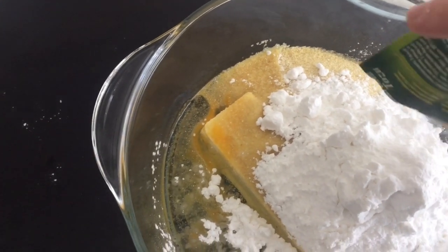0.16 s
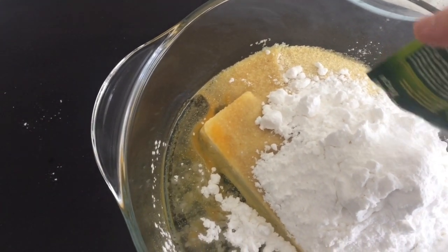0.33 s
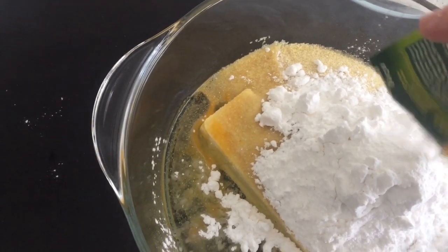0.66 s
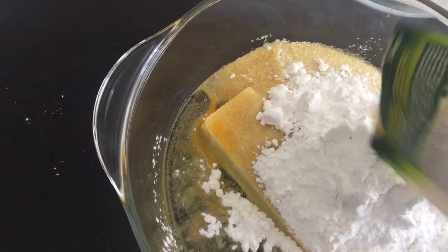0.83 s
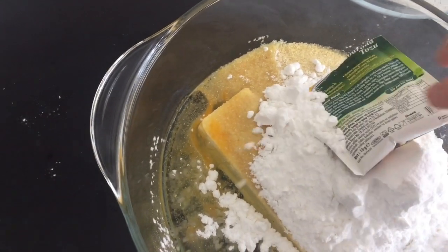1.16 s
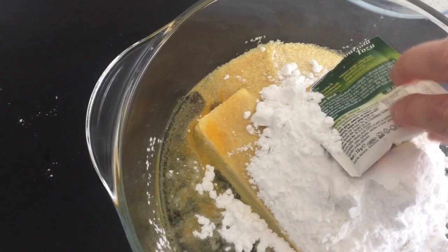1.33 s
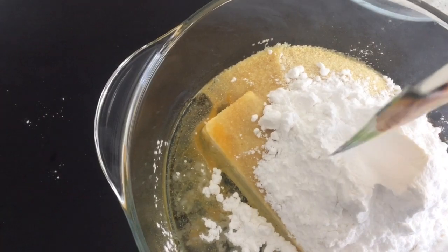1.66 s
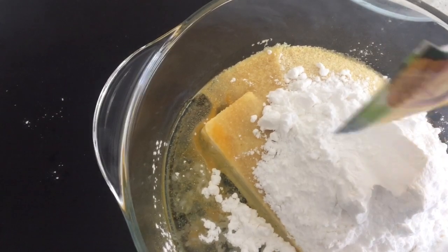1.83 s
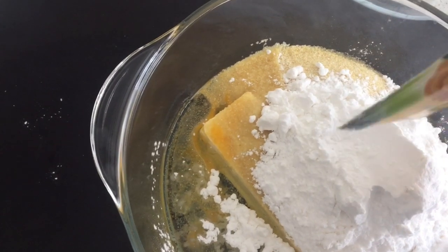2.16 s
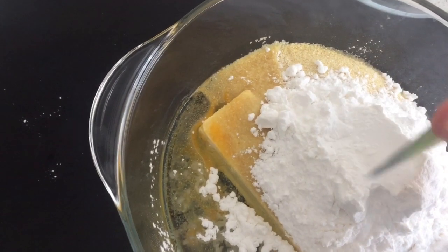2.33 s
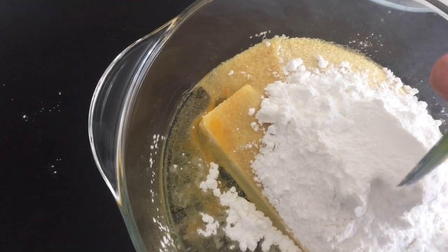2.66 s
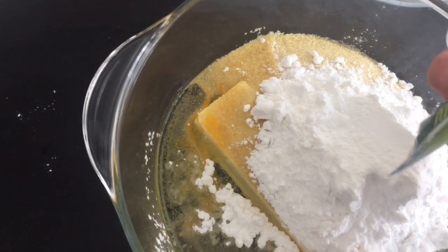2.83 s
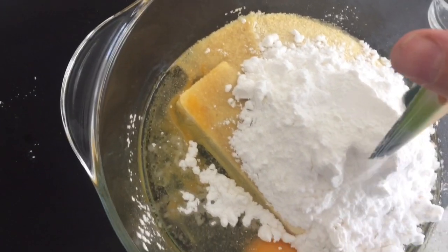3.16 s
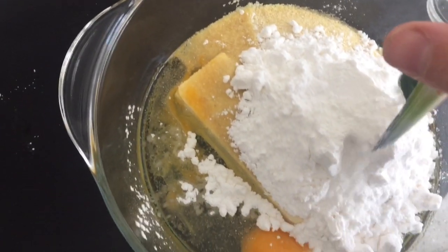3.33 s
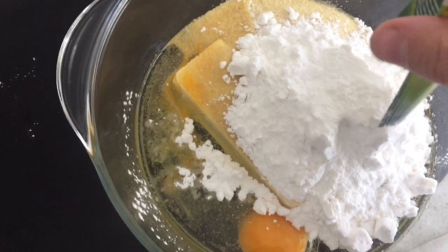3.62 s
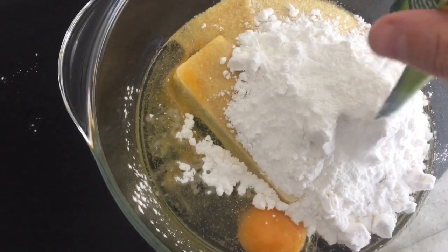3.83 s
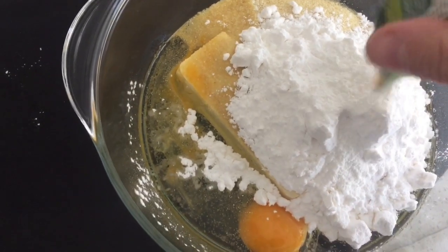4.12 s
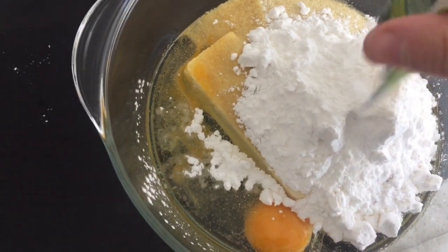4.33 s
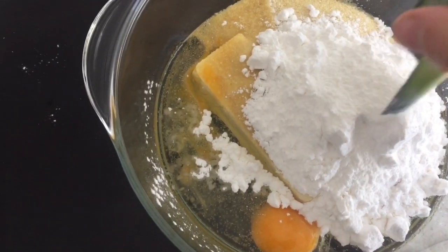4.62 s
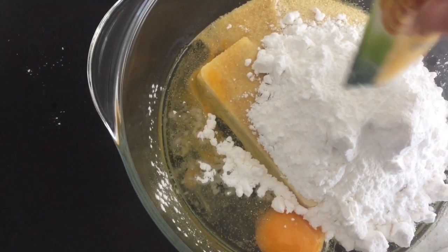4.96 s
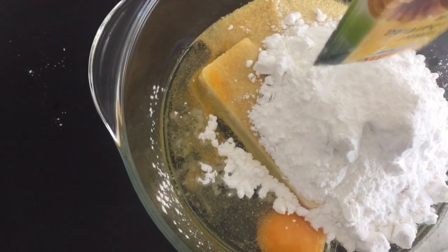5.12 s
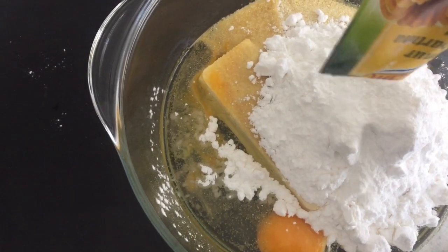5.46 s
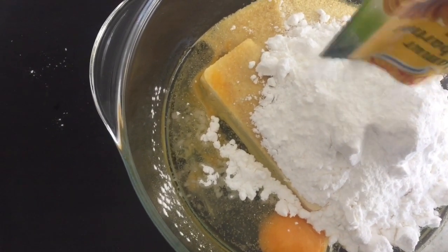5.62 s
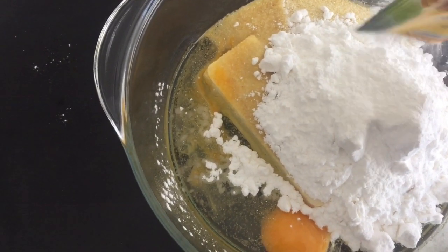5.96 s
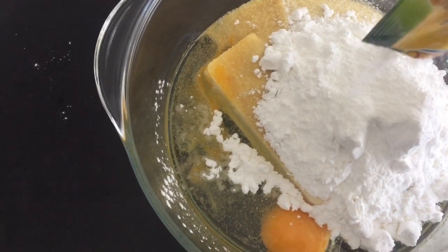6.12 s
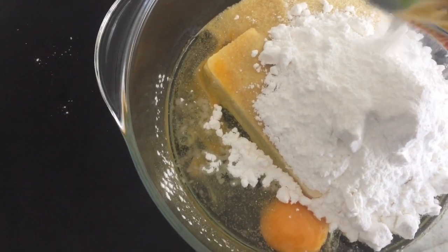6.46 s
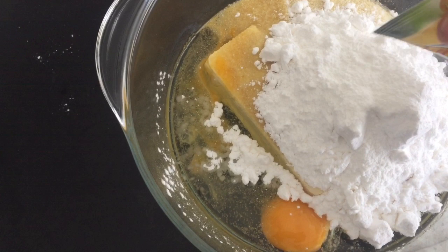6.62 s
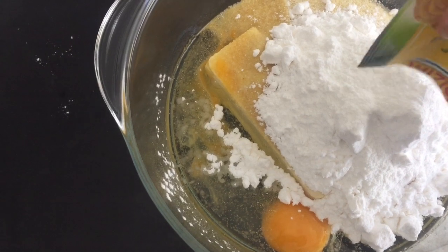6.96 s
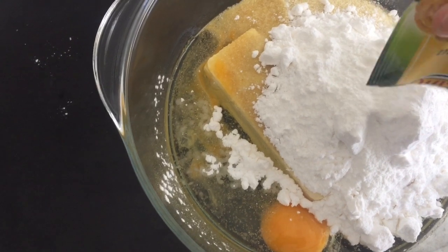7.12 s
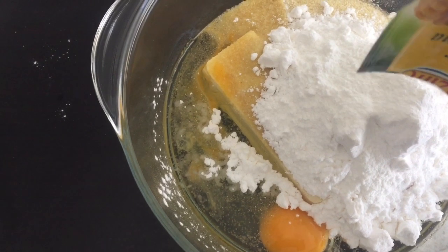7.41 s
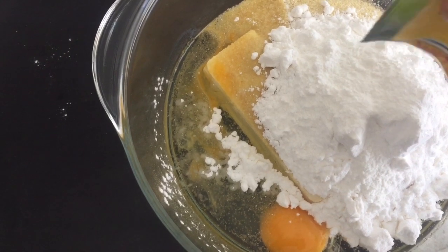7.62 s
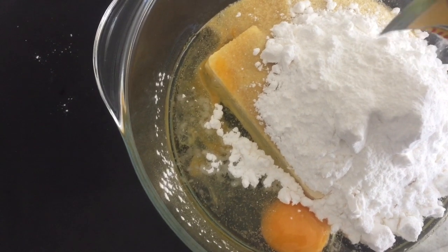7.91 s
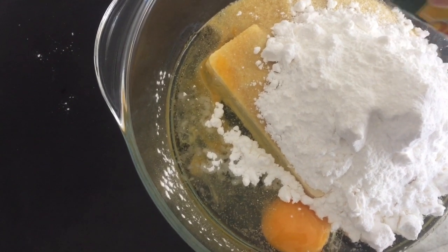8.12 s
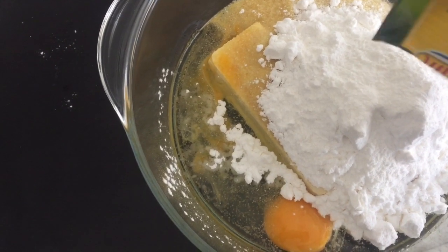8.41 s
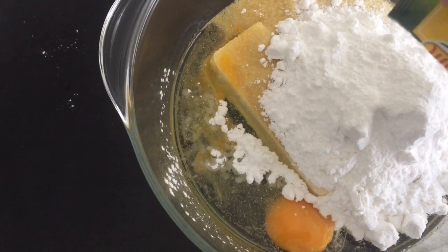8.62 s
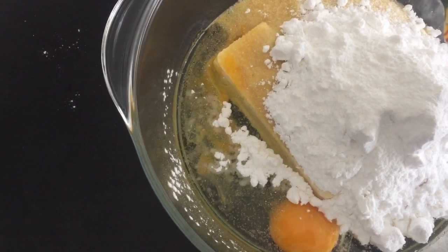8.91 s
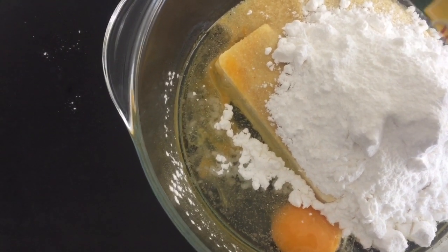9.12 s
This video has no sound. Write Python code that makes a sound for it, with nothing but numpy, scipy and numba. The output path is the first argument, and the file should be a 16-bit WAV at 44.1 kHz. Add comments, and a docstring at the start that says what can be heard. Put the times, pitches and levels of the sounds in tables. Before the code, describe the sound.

A low, wavering kitchen hum with faint hiss runs throughout. From 0.3 to 1 s a small paper sachet gives faint ticks and light, bright brushing. At 1.5 s comes a clear crisp double snap, then quiet, with a soft rub and crackles at 2.2 s. A sharper cluster cracks at 3.05 s, another snap at 3.6 s, and small ticks at 4.2 and 4.5 s, separated by near silence and occasional dull, soft hand bumps. From about 4.9 s the rustling becomes almost continuous: gritty swishes at 5 s, a bright snap at 5.4 s, and a dense burst of crackles from 6.3 to 6.7 s. Irregular shaking strokes follow through 7 s, with rapid wrinkling around 8.1 s. The strongest, driest cracks come at 8.5, 8.8 and 9.25 s, with soft low flapping underneath and a brief hollow bowl ring. It ends mid-rustle at about 9.3 s.

```python
"""A faint low hum, then dry paper snaps: a small sachet is tipped, flexed and shaken over a glass bowl in a kitchen.
Creases buckle as bursts of damped modes, wrinkles tick at random, and the walls rub as gritty filtered noise.
The hand adds soft decaying tones and the flapping sides a low noise flutter.
Resonators and short noise tails make the bowl and room; the hum and hiss are shaped noise."""
import sys
import numpy as np
from scipy import signal
from scipy.fft import rfft, irfft, next_fast_len
from scipy.io import wavfile
from numba import njit

SR = 44100
rng = np.random.default_rng(int(sys.argv[2]) if len(sys.argv) > 2 else 0)


def to_wav(s):
    """Save 16-bit WAV."""
    ch = np.atleast_2d(s).T  # columns
    pcm = np.round(np.clip(ch, -1, 1) * 32767)  # PCM
    wavfile.write(sys.argv[1], SR, pcm.astype(np.int16))


N = 409248
TIME = np.arange(N) / SR
LOW_CUT_HZ, TOP_HZ = 690, 16300


def undb(db):
    """Decibels to gain."""
    return 10 ** (np.asarray(db) / 20)


def unit(x):
    """Scale to rms 1."""
    return x / np.sqrt(np.mean(x ** 2) + 1e-20)


def colour(points, hz):
    """Spectrum gain, with dB interpolated over log frequency."""
    point_hz, point_db = np.transpose(points)
    log_hz = np.log(np.maximum(hz, 1))
    return undb(np.interp(log_hz, np.log(point_hz), point_db))


def shaped(x, points):
    """Give a signal a spectrum, at rms 1."""
    size = next_fast_len(N)
    gain = colour(points, np.fft.rfftfreq(size, 1 / SR))
    return unit(irfft(rfft(x, size) * gain, size)[:N])


def walk(rate_hz):
    """Random values joined by straight lines, rate_hz new ones a second, at rms 1."""
    values = rng.standard_normal(N // 10)
    return unit(np.interp(TIME * rate_hz, np.arange(N // 10), values))


def fade(t_s, t60_s):
    """Exponential decay by 60 dB in t60_s."""
    return np.exp(-np.log(1000) * t_s / t60_s)


def add(out, start_s, sound):
    """Mix a sound in at a time."""
    i = int(np.clip(start_s * SR, 0, N - 1))
    out[i:i + len(sound)] += sound[:N - i]


def swell(top_s, half_s):
    """Gaussian rise and fall, down to 1/e at half_s from the top."""
    return np.exp(-((TIME - top_s) / half_s) ** 2)


def envelope(full_s, hold_s, attack_s=0.024, release_t60_s=0.071):
    """One finger move: linear attack ending at full_s, hold, exponential release."""
    t = TIME - full_s
    attack = np.clip(1 + t / attack_s, 0, 1)
    return attack * fade(np.clip(t - hold_s, 0, 1), release_t60_s)


# Spectrum of the paper modes in a crack. Each row: frequency in Hz, relative level in dB.
CRACK_SPECTRUM = [(300, -36), (600, -8.5), (1100, -3.5), (1500, -1), (2400, 4.5), (4300, 3.5), (6600, 1),
                  (9000, 1.5), (15000, -3.5)]


def buckle(facet_hz, facet_db, ring_ms, count=110, in_step=0.66, facet_q=4.65):
    """One crease flips: dense, heavily damped paper modes, coloured by the facet they set ringing."""
    t = np.arange(SR // 36) / SR
    hz = (np.arange(count) + 3 + rng.random(count)) * TOP_HZ / (count + 3)
    octave = np.log2(hz / 4000)[:, None]
    # modes partly in step give the sharp front
    size = colour(CRACK_SPECTRUM, hz) * (in_step + rng.uniform(-0.96, 1, count))
    # bending waves: treble arrives first and dies soonest
    age_s = np.maximum(t - 0.0003 * 2 ** (-octave / 2), 0)
    t60_s = ring_ms / 1000 * 2 ** (-0.3 * octave)
    rise = 1 - np.exp(-age_s / (t60_s / 80))
    modes = np.sin(2 * np.pi * hz[:, None] * age_s) * rise * fade(age_s, t60_s)
    crack = size @ modes
    facet = signal.lfilter(*signal.iirpeak(facet_hz, facet_q, fs=SR), crack)
    sound = crack + undb(facet_db) * facet
    front_rms = np.sqrt(np.mean(sound[:SR // 200] ** 2))
    return sound / front_rms


# Larger creases. Each row: time in seconds, level in dB, facet pitch in Hz, facet gain over the bare crack in dB.
CREASES = [(0.357, -52, 1300, 22), (0.7017, -41.0, 12980, 20), (0.712, -35.5, 12660, 13),
           (0.7186, -36, 13650, 8), (0.7655, -40.5, 14000, 12), (0.7876, -44, 1910, 30),
           (0.897, -52, 4860, 16), (0.9756, -45.5, 945, 19), (1.047, -56.5, 1120, 35),
           (1.44, -52.5, 2640, 21), (1.477, -46, 1050, 21), (1.495, -26, 3200, 3.5), (1.505, -29, 2550, 9),
           (1.513, -40, 2280, 11), (1.76, -39.5, 4240, 6), (2.219, -44, 3250, 4), (2.228, -35, 4700, 17),
           (2.232, -36, 1570, 20), (2.247, -32, 1390, 9), (2.3735, -56, 1780, 6), (2.485, -57, 1700, 17),
           (3.022, -48.5, 1920, 21), (3.046, -35.5, 1560, 33), (3.053, -37.5, 1150, 21),
           (3.0685, -32, 2680, 13), (3.081, -24.5, 2320, 11.5), (3.0821, -27, 9500, 15),
           (3.58, -48.5, 1670, 16), (3.6387, -30, 1720, 9.5), (3.6444, -27.5, 2510, -2),
           (4.026, -36.5, 3030, 6), (4.115, -44, 2430, 36), (4.1989, -33.5, 1430, 10),
           (4.5132, -33.5, 2870, 7), (4.584, -32, 13310, 6.5), (4.601, -41, 1600, 26),
           (4.822, -54.5, 1710, 36), (4.876, -32.5, 10500, 1), (4.978, -35.5, 1650, 12),
           (4.9958, -29.5, 2070, 7), (5.0546, -32.5, 11740, 4), (5.073, -35, 2940, 12),
           (5.082, -34, 5950, 12), (5.1224, -42.5, 2530, 15), (5.14, -42, 5380, 13), (5.24, -35, 2100, 16),
           (5.2505, -34.5, 1960, 8), (5.2789, -29.5, 2010, 0), (5.2908, -26, 2100, 4),
           (5.3841, -22.5, 6600, 17.5), (5.5843, -43.0, 1850, 22), (5.6075, -45, 2230, 29),
           (5.6842, -27.5, 2150, 9.5), (5.85, -44.5, 9130, 8), (5.874, -36, 6860, 2),
           (6.0097, -33, 5400, 5), (6.2043, -35, 1200, -5), (6.2127, -29.5, 4650, 3),
           (6.296, -20, 5230, 16), (6.3347, -26.5, 6100, 11), (6.3443, -25.5, 5200, 13),
           (6.359, -36, 4080, 5), (6.397, -36.5, 1700, 14), (6.419, -25, 14000, 0), (6.4463, -25, 6250, 9),
           (6.4641, -23.5, 8460, 6.5), (6.4785, -34, 5950, 10), (6.5113, -26.5, 6410, 10),
           (6.5218, -26.5, 2030, 9), (6.531, -25.5, 5200, 10), (6.5656, -24.5, 1950, 0),
           (6.654, -28.0, 2030, 9), (6.7075, -26, 2330, 5), (6.821, -28.5, 3590, 1),
           (6.8435, -26.5, 4770, 1), (7.01, -22, 5950, 10), (7.0445, -29.5, 7090, 22),
           (7.071, -22.5, 4180, 9), (7.093, -35, 13310, 10), (7.1259, -36, 2870, -2),
           (7.16, -38.5, 2070, 4), (7.1953, -33, 2010, -8), (7.5375, -35.5, 970, 16),
           (7.6203, -28.5, 1130, 11), (7.6282, -29, 8460, -3), (7.64, -25.5, 1060, 17),
           (7.809, -39, 3780, 19), (7.925, -29, 3700, 4.5), (8.0032, -27, 4040, -3), (8.0545, -36, 990, 17),
           (8.095, -32.5, 3090, 11), (8.114, -37.5, 6410, 10), (8.149, -33.0, 1870, 8),
           (8.1528, -28.5, 1940, 6), (8.203, -34.5, 3220, 6), (8.2247, -29.0, 3420, 2),
           (8.248, -37, 1570, 6), (8.292, -35.5, 2530, 24), (8.324, -30.5, 2530, 0),
           (8.334, -31.5, 3350, 14), (8.345, -33.5, 2680, 8), (8.3826, -31.5, 2050, 4),
           (8.474, -17, 11900, 16), (8.5317, -34.5, 2170, 10), (8.559, -38.5, 3170, 6),
           (8.576, -37.5, 1940, 24), (8.599, -38.5, 1240, 13), (8.642, -38, 1070, 10),
           (8.6735, -35, 950, 0), (8.683, -31, 1100, 7), (8.6968, -39, 4400, 18), (8.8, -25.5, 8680, 21),
           (8.824, -24, 13310, 5), (8.869, -21, 6960, 11), (8.873, -31, 2460, -3), (8.9227, -27, 2570, 18),
           (8.9521, -21.0, 1130, 7), (9.055, -28.5, 2290, 30), (9.113, -28.5, 8500, 3),
           (9.253, -19.5, 3300, 2.5)]


def snaps(lead_s=0.0003, give_db=-21, settle_db=-17, ring_ms=7.08):
    """Larger creases: each gives a little, flips, and settles."""
    out = np.zeros(N)
    for time_s, db, facet_hz, facet_db in CREASES:
        before_s, after_s, stretch = rng.uniform([0.0008, 0.002, 0.7], [0.003, 0.007, 1.4])
        for lag_s, part_db in (-before_s, give_db), (0, 0), (after_s, settle_db):
            sound = buckle(facet_hz, facet_db, ring_ms * stretch)
            add(out, time_s - lead_s + lag_s, undb(db + part_db) * sound)
    return out


def crackle(strength, rate_hz=150, centre_hz=2500, facet_db=6, ring_ms=4.2, count=40):
    """Strain lets go at random instants and sizes, each time flipping one of many wrinkles."""
    wrinkles = [buckle(centre_hz * 2 ** rng.uniform(-1.06, 1), facet_db, ring_ms) for _ in range(count)]
    out = np.zeros(N)
    for time_s in np.cumsum(rng.exponential(1 / rate_hz, N // 80)):
        size_db = 5 * np.clip(rng.standard_normal(), -2, 2)
        if time_s < N / SR:
            add(out, time_s, wrinkles[rng.integers(count)] * undb(size_db))
    return unit(out) * strength


# Squeezes that raise a dense run of wrinkles. Each row: full strength at in seconds, hold in seconds, level in dB.
SQUEEZE_MOVES = [(6.42, 0.048, -38.5), (8.04, 0.187, -40), (8.54, 0.167, -46), (9.075, 0.038, -40)]


def wrinkling(slide_db, slide_wrinkle_db=-11.5):
    """Wrinkle strength: squeezes, plus a share of the sliding."""
    squeezing = sum(undb(db) * envelope(full_s, hold_s) for full_s, hold_s, db in SQUEEZE_MOVES)
    return np.hypot(squeezing, undb(slide_db + slide_wrinkle_db))


# Light rustle between strokes, joined by straight lines. Each row: time in seconds, relative level in dB.
LIGHT_RUSTLE = [(0, -74), (1.2, -85), (2.4, -72), (3.4, -85.5), (4.8, -74), (4.9, -54.5), (7.3, -54.5),
                (8.8, -52), (9.28, -56.5)]
# Instants when the fingers stop between shakes. Each entry: time in seconds.
FINGER_RESTS = [5.19, 5.49, 6.26, 6.78, 6.954, 8.445, 9.02]


def contact(rest_half_s=0.013, rest_db=-11.5):
    """Strength of the light rustle, which sinks at each finger rest."""
    time_s, level_db = np.transpose(LIGHT_RUSTLE)
    resting = sum(swell(s, rest_half_s) for s in FINGER_RESTS)
    return undb(np.interp(TIME, time_s, level_db) + rest_db * resting)


# Strokes of sliding paper and powder.
# Each row: full strength at in seconds, hold in seconds, relative level in dB, treble over body in dB.
SLIDE_STROKES = [(0.256, 0.015, -61.5, 4), (0.65, 0.036, -52, 4), (0.702, 0.2, -56, 14),
                 (0.971, 0.043, -60.5, 21), (1.48, 0.074, -60, -3), (2.2, 0.064, -52.5, 0.5),
                 (2.29, 0.17, -62.5, 2), (2.568, 0.067, -60, 2.5), (2.714, 0.022, -56.5, -3),
                 (3.053, 0.037, -48, -3), (3.618, 0.058, -59, 0), (4.174, 0.12, -64, -1),
                 (4.467, 0.16, -63, -2), (4.785, 0.02, -64, -13), (4.868, 0.018, -46, 5),
                 (5.03, 0.05, -39.5, 5.5), (5.24, 0.086, -45.5, 5), (5.41, 0.053, -53.5, 14),
                 (5.631, 0.19, -49.5, 9), (5.95, 0.037, -50, 10), (6.53, 0.049, -45.5, -8),
                 (6.656, 0.04, -45, 6), (6.809, 0.084, -43, 0.5), (7.028, 0.053, -45, -6),
                 (7.282, 0.053, -44, 9), (7.391, 0.073, -50, 3), (7.578, 0.18, -45, 2),
                 (8.353, 0.043, -37, -0.5), (9.069, 0.046, -40.5, 0), (9.224, 0.038, -36.5, -2.5)]


def sliding(contact_bright_db=4.5):
    """Sliding level and brightness in dB; brightness is the power-weighted mean of all strokes."""
    power = contact() ** 2
    bright = power * contact_bright_db
    for full_s, hold_s, db, bright_db in SLIDE_STROKES:
        stroke = (undb(db) * envelope(full_s, hold_s)) ** 2
        power = power + stroke
        bright = bright + stroke * bright_db
    return 10 * np.log10(power), bright / power


def warp(x, spread_db=3.0, rate_hz=20, count=18):
    """As the sheet bends its resonances shift: each band swells and sinks on its own."""
    size = next_fast_len(N)
    spectrum = rfft(x, size)
    edges_hz = np.geomspace(LOW_CUT_HZ, TOP_HZ, count)
    position = np.interp(np.fft.rfftfreq(size, 1 / SR), edges_hz, np.arange(count))
    out = np.zeros(N)
    for k in range(count):
        window = np.clip(1 - abs(position - k), 0, 1)
        band = irfft(spectrum * window, size)[:N]
        out += band * undb(spread_db * walk(rate_hz))
    return unit(out)


# Spectrum of the rubbing walls. Each row: frequency in Hz, relative level in dB.
RUB_SPECTRUM = [(350, -18), (700, 0.5), (1100, -2.5), (1500, 0), (2600, 2.5), (4000, 0.5), (6000, -1.5),
                (9000, -2.5), (15300, -4), (16200, -46)]


def rubbing(level_db, bright_db, grit_db=5, split_hz=5000, gain_db=-1, step_db=2.1):
    """Fibres and powder catch and slip thousands of times a second: gritty noise in body and treble."""
    grit = rng.standard_normal(N) * undb(grit_db * walk(2500))
    slips = warp(shaped(grit, RUB_SPECTRUM))
    body = signal.sosfiltfilt(signal.butter(2, split_hz, fs=SR, output="sos"), slips)
    hiss = unit(slips - body) * undb(bright_db + walk(40))
    balanced = (unit(body) + hiss) / np.sqrt(1 + undb(2 * bright_db))
    # the walls slide in short, uneven steps
    return balanced * undb(level_db + gain_db + step_db * walk(70))


@njit
def resonance(x, hz, width_hz):
    """State-variable band-pass with a moving centre, gain 1 there."""
    y, band, low = np.empty(len(x)), 0., 0.
    for i in range(len(x)):
        g, k = np.tan(np.pi * hz[i] / SR), width_hz / hz[i]
        v = (band + g * (x[i] - low)) / (1 + g * (g + k))
        band, low, y[i] = 2 * v - band, low + 2 * g * v, k * v
    return y


# Air resonances of the open sachet. Each row: mean pitch in Hz, width in Hz, gain in dB.
POUCH_MODES = [(1810, 210, 3.5), (2740, 260, 3), (6600, 190, -6)]


def pouch(x, pours_until_s=5.3):
    """Air in the open sachet rings, shifting in pitch as it flexes, until it is pinched flat for shaking."""
    x = x * envelope(0, pours_until_s)
    flex = np.exp(0.06 * walk(7))
    return sum(undb(db) * resonance(x, hz * flex, float(width_hz)) for hz, width_hz, db in POUCH_MODES)


# Flexes of the whole sachet that push air. Each row: top in seconds, half length in seconds, level in dB.
AIR_PUFFS = [(0.01, 0.042, -57.5), (0.989, 0.029, -54), (1.626, 0.029, -54.5), (1.948, 0.04, -53.5),
             (6.404, 0.054, -58), (7.577, 0.075, -55), (8.126, 0.11, -50.5), (8.65, 0.17, -55),
             (8.94, 0.13, -50.5)]


def flapping(slide_db, wrinkle_strength, slide_flap_db=-17.5, wrinkle_flap_db=-20):
    """Flap strength: rounded puffs, plus shares of the sliding and wrinkling."""
    puffing = sum(undb(db) * swell(top_s, half_s) for top_s, half_s, db in AIR_PUFFS)
    return puffing + undb(slide_db + slide_flap_db) + undb(wrinkle_flap_db) * wrinkle_strength


# Spectrum of the flapping sides. Each row: frequency in Hz, relative level in dB.
FLEX_SPECTRUM = [(50, -13), (100, -7), (170, -8), (260, -0.5), (380, -6), (560, -15), (720, -9), (850, -30),
                 (1150, -17), (2200, -37)]


def flutter(strength, flicker_db=3.0):
    """The broad sides flap and push air: low noise of flickering level."""
    return shaped(rng.standard_normal(N), FLEX_SPECTRUM) * strength * undb(flicker_db * walk(35))


# Soft bumps of the hand. Each row: time in seconds, level in dB, pitch in Hz.
HAND_BUMPS = [(1.354, -43, 100), (1.782, -51, 81), (2.999, -49, 185), (3.298, -46, 110), (3.361, -47, 82),
              (3.809, -49, 85), (8.646, -45, 83), (8.825, -35.5, 244)]


def bumps(push_s=0.0012, t60_s=0.15, overtone_db=-7):
    """Dull knocks as the hand jerks: a decaying tone and an overtone at sqrt(2) times its pitch."""
    out, t = np.zeros(N), np.arange(SR // 4) / SR
    shape = (1 - np.exp(-t / push_s)) * fade(t, t60_s)
    for time_s, db, hz in HAND_BUMPS:
        phase = 2 * np.pi * hz * t
        ring = np.sin(phase) + undb(overtone_db) * np.sin(np.sqrt(2) * phase)
        add(out, time_s, undb(db) * ring * shape)
    return out


# Resonances between hand, sachet and bowl. Each row: pitch in Hz, width in Hz.
HOLLOW_MODES = [(1120, 58), (2480, 150), (3900, 1200)]


def hollow(x, db):
    """Air between hand, sachet and bowl rings briefly at a few pitches."""
    ringing = sum(signal.lfilter(*signal.iirpeak(hz, hz / width_hz, fs=SR), x) for hz, width_hz in HOLLOW_MODES)
    return undb(db) * ringing


def echoes(x, t60_s, db, dull_hz, delay_s):
    """Dense reflections, slightly late and dulled: convolution with a decaying noise tail."""
    t = np.arange(SR // 2) / SR
    tail = rng.standard_normal(len(t)) * fade(t, t60_s) * (t > delay_s)
    tail = signal.sosfilt(signal.butter(1, dull_hz, fs=SR, output="sos"), tail)
    return undb(db) * signal.fftconvolve(x, tail / np.linalg.norm(tail))[:N]


# Spectrum of the kitchen background. Each row: frequency in Hz, relative level in dB.
KITCHEN_SPECTRUM = [(25, -74), (52, -1), (68, -9.5), (86, 4), (125, -3), (190, -8), (240, 0), (340, -4),
                    (480, -16.5), (720, -15), (1400, -20), (2600, -22), (5000, -29), (16000, -32.5)]


def kitchen(level_db=-60.5, waver_db=2.3):
    """Low, wavering appliance drone and faint hiss, both from shaped noise."""
    air = shaped(rng.standard_normal(N), KITCHEN_SPECTRUM) * undb(level_db)
    drone = signal.sosfiltfilt(signal.butter(2, 450, fs=SR, output="sos"), air)
    return air + drone * (undb(waver_db * walk(13)) - 1)


def scene():
    """Finger motion drives the close paper sounds; bowl, walls and kitchen surround them."""
    slide_db, bright_db = sliding()
    wrinkle_strength = wrinkling(slide_db)
    # lone wrinkles tick in step with the light rustle level
    strays = crackle(contact() * undb(-2.5), rate_hz=48, centre_hz=3200, facet_db=15)
    rustle = crackle(wrinkle_strength) + strays + rubbing(slide_db, bright_db)
    # so small a sheet radiates almost no bass
    bass_cut = signal.butter(3, LOW_CUT_HZ, "high", fs=SR, output="sos")
    paper = signal.sosfilt(bass_cut, snaps() + rustle + pouch(rustle))
    flaps = flutter(flapping(slide_db, wrinkle_strength))
    bowl = echoes(paper, t60_s=0.022, db=-12, dull_hz=7600, delay_s=0.001577) + hollow(paper, db=-5.5)
    walls = echoes(paper, t60_s=0.26, db=-17, dull_hz=5800, delay_s=0.0014)
    return (paper + flaps + bumps() + bowl + walls + kitchen())[None]


def record(dry, notch_hz=10400, notch_q=9, notch_depth=0.24):
    """The microphone port carves a narrow treble dip; deep bass and the extreme top are cut."""
    notched = signal.lfilter(*signal.iirnotch(notch_hz, notch_q, fs=SR), dry)
    heard = dry + notch_depth * (notched - dry)
    heard = signal.sosfilt(signal.butter(4, 45, "high", fs=SR, output="sos"), heard)
    return signal.sosfilt(signal.ellip(10, 0.2, 70, TOP_HZ, fs=SR, output="sos"), heard)


dry = scene()
out = record(dry)
to_wav(out)
```